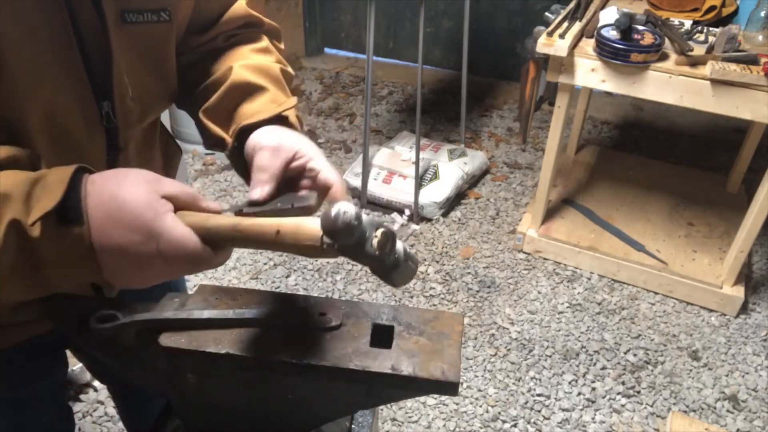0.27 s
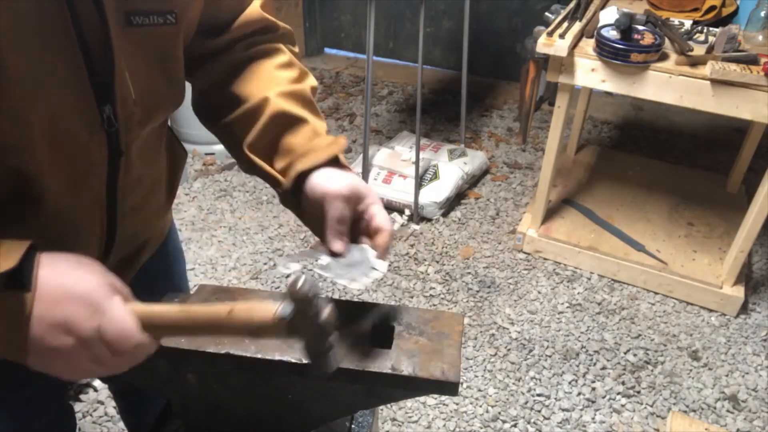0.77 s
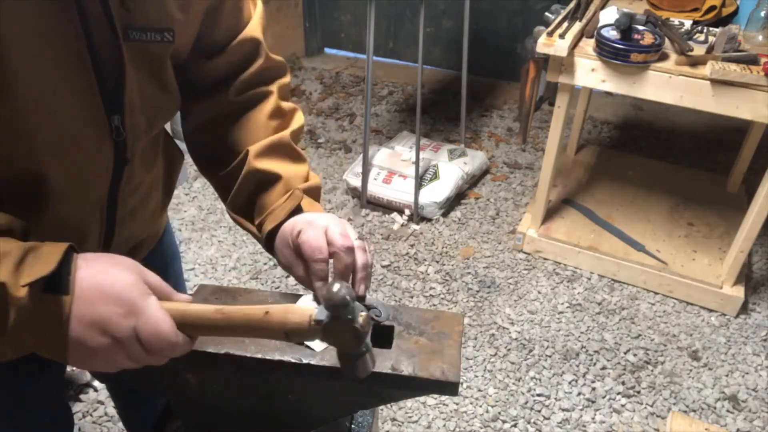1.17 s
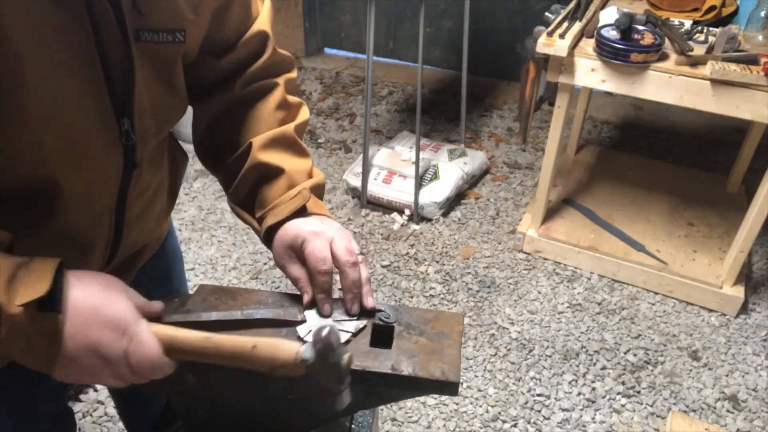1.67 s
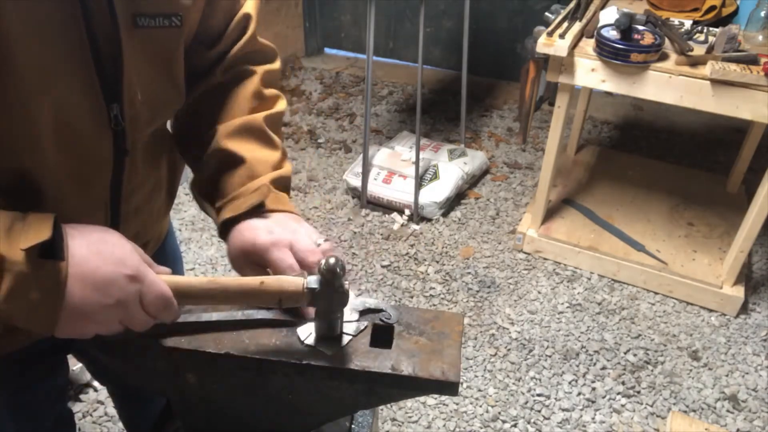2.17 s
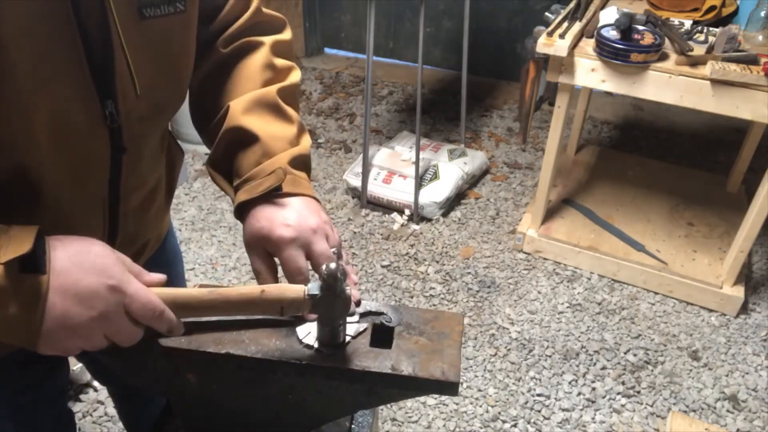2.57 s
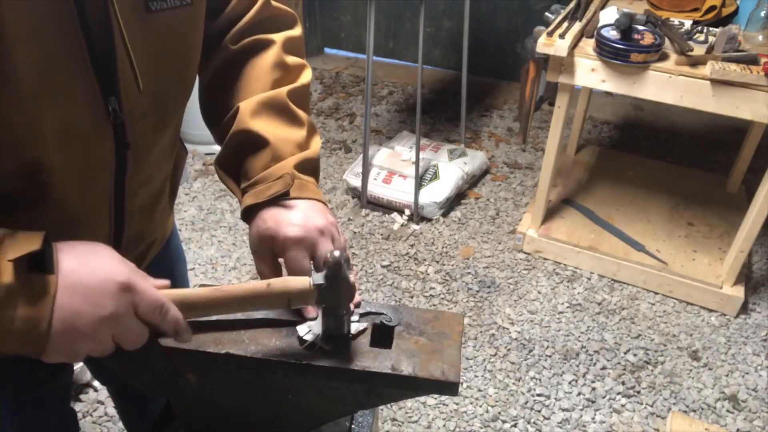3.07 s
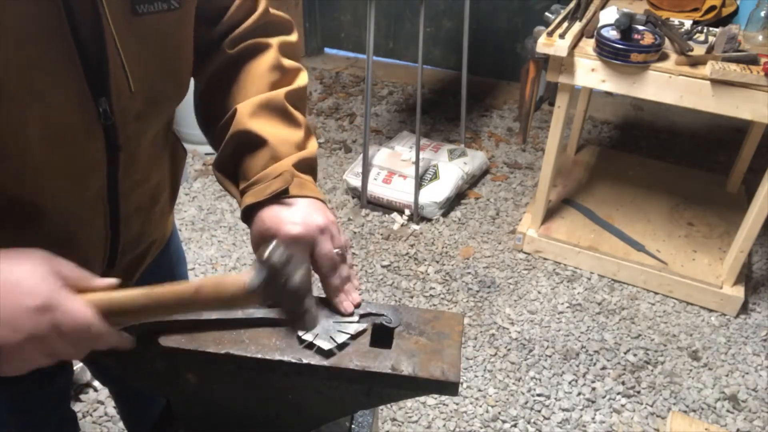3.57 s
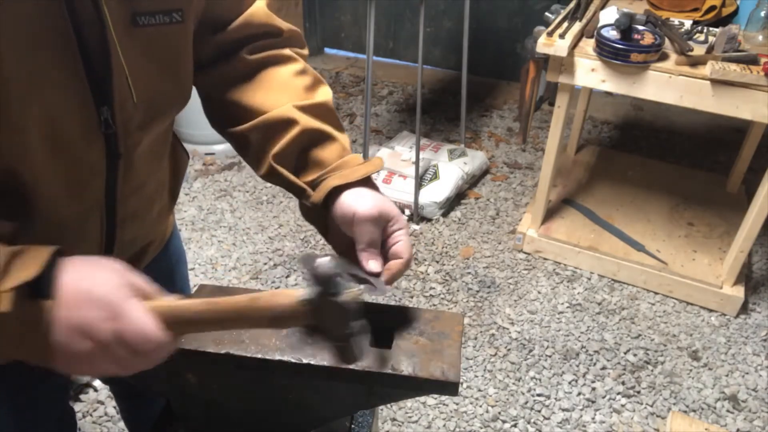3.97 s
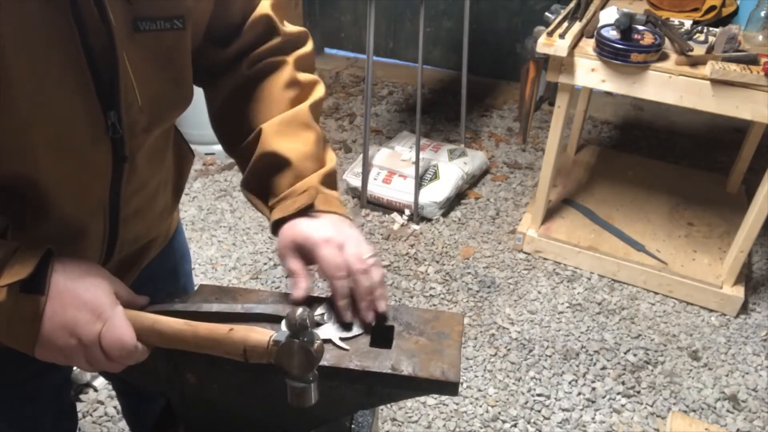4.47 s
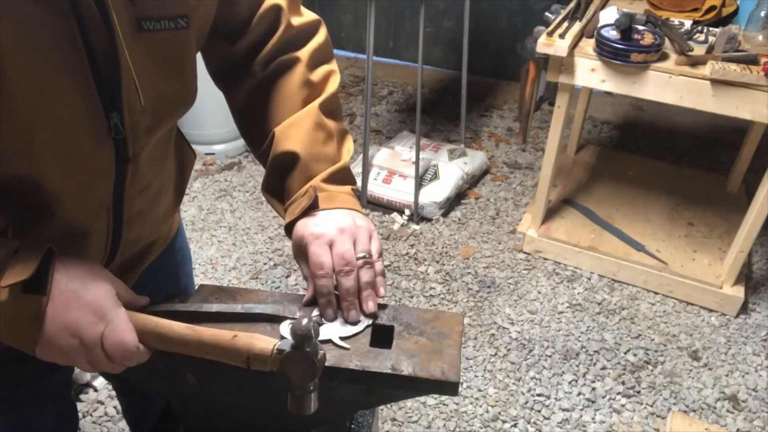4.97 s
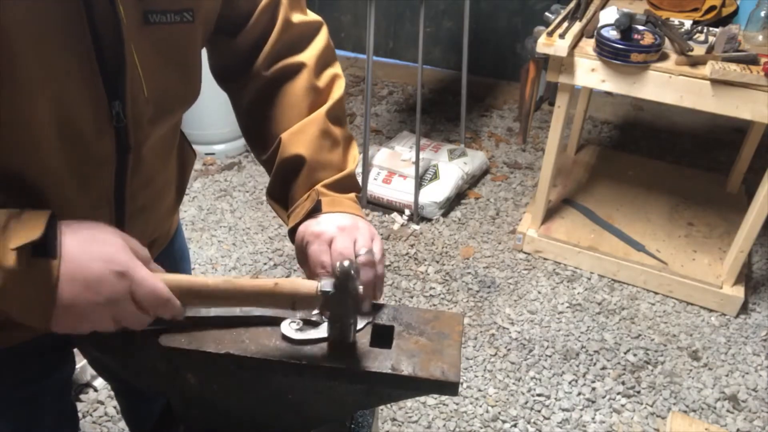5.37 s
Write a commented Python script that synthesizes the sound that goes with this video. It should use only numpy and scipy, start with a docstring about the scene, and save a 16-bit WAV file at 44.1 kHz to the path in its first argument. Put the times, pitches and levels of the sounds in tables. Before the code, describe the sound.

Faint hand bumps, sleeve rustle and light metallic clinks come first as a piece of thin sheet steel is positioned on an anvil. Midway, a small hammer strikes it in a fast, even burst, each blow a sharp crack with a short thud. After a pause of soft clinking and sliding, the hammer taps again briefly. The microphone is close, in a dry workshop with low steady room noise.

```python
"""A quiet, nearly dead workshop: a small hammer taps thin sheet steel, hand-pressed flat on an anvil.
Clamped under the blow, the sheet barely rings: each tap is a bright crack and a thud,
thrown back by the nearby floor and bench. Between taps the loose sheet clinks and scrapes
as it is turned, hands click and bump on the work, and a canvas sleeve rustles."""
import sys
import numpy as np
from scipy import signal
from scipy.fft import rfft, irfft, next_fast_len
from scipy.io import wavfile
from scipy.ndimage import uniform_filter1d

SR = 44100
rng = np.random.default_rng(int(sys.argv[2]) if len(sys.argv) > 2 else 0)


def unload_audio(sound):
    """Save the sound as a 16-bit wav file, at the path given as the first command line argument."""
    columns = np.transpose(np.atleast_2d(sound))
    # keep every value between -1 and 1, then stretch to whole-number steps
    steps = np.round(np.clip(columns, -1, 1) * 32767)
    wavfile.write(sys.argv[1], SR, steps.astype(np.int16))


N = 247842

# room noise spectrum: (frequency [Hz], level [dB])
AIR_SPECTRUM = [(18, -38), (30, -20), (117, -21.5), (141, -7.5), (188, -7), (264, -3), (301, -6),
                (459, -2.5), (680, -2.5), (1240, -3.5), (4980, -10), (5990, -12), (7780, -14), (14600, -13),
                (15800, -20)]
# low room resonances: (frequency [Hz], level [dB], t60 [s])
ROOM_MODES = [(488.1, -1.5, 0.143), (333.1, 3.5, 0.0706), (1590, -29, 0.14)]
# early reflections off floor, bench and body: (delay [s], level [dB])
REFLECTIONS = [(.0049, -20.5), (.0064, -16), (.0078, -16.5), (.0091, -39.5), (0.0126, -33)]
# canvas and skin on steel: (frequency [Hz], level [dB])
RUB_SPECTRUM = [(30, -33.5), (150, -11), (450, 7), (800, -8), (1800, 6), (2500, 5), (3800, -1), (5800, 3),
                (8000, 0), (13000, 1), (15600, 2), (17000, -45.5)]
# rubbing as the sleeve moves and the sheet is dragged: (time [s], level [dB])
RUB_ENVELOPE = [(0, -70), (.17, -62), (.33, -78), (.78, -70.5), (1.12, -65), (1.5, -64.5), (1.619, -70.5),
                (2.22, -68), (2.29, -60.5), (2.38, -68.5), (3.62, -72), (3.86, -62), (4.45, -63.5),
                (4.68, -67.5), (5.03, -75), (5.1, -63), (5.48, -66), (5.62, -65.5)]
# brisker rubbing is brighter: (level [dB], treble [dB])
RUB_BRIGHTNESS = [(-66.5, -2), (-59.5, 5)]
# sheet slips through the fingers: (time [s], length [s], level [dB], pitch [Hz])
FINGER_SLIPS = [(.475, 0.173, -66.5, 5513), (0.494, 0.158, -71, 12800), (5.063, 0.29, -77, 9800),
                (5.06, 0.32, -81, 5870)]
# grip shifts: (time [s], level [dB], snap [dB])
GRIP_CLICKS = [(0.2074, -28.5, 13), (5.2297, -18.5, -10)]
# modes of a grip click: (frequency [Hz], level [dB], t60 [s])
GRIP_MODES = [(1953, 4.5, 0.046), (2183, -6.5, 0.082), (4740, -12.5, 0.054), (5350, -4.5, 0.023),
              (5445, 7.5, 0.012)]
# soft bumps of hand and tools: (time [s], level [dB], pitch [Hz])
HAND_BUMPS = [(0.109, -26.5, 830), (0.267, -27, 739), (0.479, -25.5, 1227), (3.668, -14, 728),
              (4.356, -28.5, 650), (4.525, -8.5, 1172)]
# loose sheet on the anvil: (time [s], level [dB], brightness [dB], slide scale [s], spot pitch [Hz])
SHEET_CLINKS = [(1.138, -32, 11.5, 0.0041, 4850), (1.1554, -33, 14.5, 0.00072, 4930),
                (1.326, -20.5, 7.5, .034, 13700), (1.3719, -22, 10, .005, 15200),
                (1.402, -20.5, 3, 0.0028, 570), (2.1089, -17.5, 9, .001, 10250),
                (2.175, -31.5, 1, 0.0055, 13100), (3.6552, -34.5, 13, 0.00184, 14300),
                (3.666, -19, 7, 0.0051, 6650), (4.2824, -24.5, 5.5, 0.0068, 5900),
                (4.3575, -34, 11.5, 0.00187, 5450), (4.4433, -28.5, 26.5, 0.0035, 2630),
                (4.679, -31.5, 16, 0.00286, 4660), (4.979, -30, 4.5, 0.0032, 5900),
                (5.473, -31, 4.5, 0.0096, 14300)]
# loose sheet modes: (frequency [Hz], level [dB], t60 [s])
LOOSE_MODES = [(1234, -35, 0.062), (2650, -28, 0.04), (4600, -42.5, 0.06), (5900, -3.5, 0.026),
               (6190, -1, 0.057), (9940, 1, 0.038), (12370, -2.5, .05), (12900, -13.5, .04),
               (13300, -21, .03), (14300, 17.5, 0.099), (14600, -9, .035)]
# high modes of the pressed sheet: (frequency [Hz], level [dB])
PRESSED_MODES = [(12161, -53.5), (12985, -60.5), (13512, -71), (13835, -50), (14050, -46.5), (14196, -57),
                 (14346, -60), (14492, -55.5), (14723, -69), (15310, -42)]
# sharp steel contact: (frequency [Hz], level [dB])
CRACK_SPECTRUM = [(30, -3.5), (150, -0.5), (900, 0), (2000, -3), (4200, -4.5), (7000, -3.5), (10000, -3),
                  (13000, -2.5), (15400, 0), (16200, -16.5)]
# hammer blows: (time [s], strength [dB], thud [dB], treble [dB], spot pitch [Hz])
HAMMER_BLOWS = [(2.3648, -9.5, 0.5, 12, 5670), (2.3803, -15, -3, 8, 6400), (2.7391, -17.5, 0, 11, 6700),
                (2.8505, 2.5, 7.5, 3.5, 8290), (2.9279, 1.5, 5, 6, 7520), (3.0063, 1.5, -1, 3.5, 1154),
                (3.0831, 5, 2.5, 3, 881), (3.168, 4.5, 0.5, 1.77, 2816), (3.249, 2.9, -1.5, 1.5, 1850),
                (3.3233, 2.5, .5, 2.6, 2400), (3.3962, 4, 3, 4.5, 1570), (3.4668, 5.5, 1.5, .5, 1783),
                (3.537, 3.5, -2.5, .5, 1600), (4.5245, -11.5, -2, 8, 326), (5.3805, -9, -13.5, -5, 3000),
                (5.4179, -6, -0.5, 2.5, 5800), (5.5336, -4.5, 13, 10.5, 7060)]


def undb(db):
    """Decibels to gain."""
    return 10 ** (np.asarray(db) / 20)


def seconds(size=8192):
    """Time axis, one event long by default."""
    return np.arange(size) / SR


def unit(x):
    """Scale to unit energy."""
    return x / np.sqrt(np.sum(x ** 2) + 1e-18)


def fade(t, t60_s):
    """Exponential decay, 60 dB in t60_s."""
    return np.exp(-np.log(1000) * t / t60_s)


def add(out, at_s, x):
    """Mix x into out from at_s."""
    i = int(at_s * SR)
    out[i:i + len(x)] += x[:N - i]


def wander(rate_hz):
    """Smooth random drift, spread near 1."""
    knots = rng.standard_normal(int(rate_hz * N / SR) + 2)
    return np.interp(seconds(N) * rate_hz, np.arange(len(knots)), knots)


def minimum_phase(x, gain):
    """Filter by a gain per frequency bin, via the folded cepstrum."""
    size = 2 * (len(gain) - 1)
    cepstrum = irfft(np.log(gain))
    cepstrum[1:size // 2] *= 2
    cepstrum[size // 2 + 1:] = 0
    return irfft(rfft(x, size) * np.exp(rfft(cepstrum)), size)[:len(x)]


def colour(x, points):
    """Filter along (frequency [Hz], level [dB]) points."""
    hz, db = np.transpose(points)
    bins_hz = np.linspace(1, SR / 2, next_fast_len(len(x)) + 1)
    return minimum_phase(x, undb(np.interp(np.log(bins_hz), np.log(hz), db)))


def resonate(x, hz, q):
    """Damped resonance, unity gain at centre."""
    return signal.lfilter(*signal.iirpeak(min(hz, SR / 2.2), q, fs=SR), x)


def emphasise(x, hz, q, lift_db=13.5):
    """Lift the band that the touched spot favours."""
    return x + (undb(lift_db) - 1) * resonate(x, hz, q)


def ring(modes, scatter_db=0, detune=0):
    """Decaying modes, unit energy; touch and grip scatter their levels and pitches."""
    t = seconds()
    out = np.zeros(len(t))
    for hz, db, t60_s in modes:
        level_draw, pitch_draw = rng.standard_normal(2)
        tone = np.sin(2 * np.pi * hz * (1 + detune * pitch_draw) * t)
        out += undb(db + scatter_db * level_draw) * unit(tone * fade(t, t60_s))
    return unit(out)


def burst(envelope, lumpy_db=0):
    """Dense micro-impacts in clumps under an envelope; whitened, unit energy."""
    clumps = np.repeat(rng.standard_normal(len(envelope)), 32)[:len(envelope)]
    impacts = envelope * undb(lumpy_db * clumps) * rng.standard_normal(len(envelope))
    smooth_power = uniform_filter1d(np.abs(rfft(impacts, 2 * len(impacts))) ** 2, size=221)
    return unit(minimum_phase(impacts, 1 / np.sqrt(smooth_power + 1e-18)))


def air(noise_db=-66.5, hum_hz=269, hum_db=-87):
    """Steady room noise and a weak hum."""
    noise = colour(rng.standard_normal(N), AIR_SPECTRUM)
    hum = np.sqrt(2) * np.sin(2 * np.pi * hum_hz * seconds(N))
    return undb(noise_db) * noise / np.std(noise) + undb(hum_db) * hum


def in_room(x, echo_db, gap_s=0.003204, build_s=0.000224, t60_s=0.0575,
            late_t60_s=0.134, late_db=-25, modes_db=-25):
    """Direct sound plus near reflections, a quick diffuse decay and low resonances."""
    t = np.maximum(seconds() - gap_s, 0)
    decay = fade(t, t60_s) + undb(late_db) * fade(t, late_t60_s)
    echo = burst((1 - np.exp(-t / build_s)) * decay, lumpy_db=4)
    for delay_s, db in REFLECTIONS:
        path_scale = 1 + .03 * rng.standard_normal()  # the smith's arms move
        echo[int(delay_s * path_scale * SR)] += undb(db)
    echo = colour(unit(echo),
                  [(60, 1), (250, -2), (620, -.5), (1000, -.5), (3000, 2), (8000, .5), (14000, 4)])
    echo += undb(modes_db) * ring(ROOM_MODES, detune=.015)
    return x + undb(echo_db) * signal.fftconvolve(x, echo)[:len(x)]


def ticks(rate_hz=18, min_db=14, spread_db=8, t60_s=.012):
    """The dragged sheet catches on specks of scale at random."""
    out = np.zeros(N)
    for when, strength, spot in rng.random((int(rate_hz * N / SR), 3)):
        spot_hz = np.interp(spot, [0, 1], [4500, 14000])
        tick = colour(burst(fade(seconds(1900), t60_s)), RUB_SPECTRUM)
        tick = emphasise(tick, spot_hz, q=20)
        add(out, when * N / SR, undb(min_db + spread_db * strength) * unit(tick))
    return out


def rubbing(gain_db=-2.5, treble_hz=5000, patch_db=4, patch_rate_hz=16):
    """Patchy friction of sleeve and sliding steel; faster hands are louder and brighter."""
    level_db = np.interp(seconds(N), *np.transpose(RUB_ENVELOPE))
    hiss = colour(burst(np.ones(N), lumpy_db=4), RUB_SPECTRUM)
    treble = signal.sosfilt(signal.butter(1, treble_hz, "high", fs=SR, output="sos"), hiss)
    lift = undb(np.interp(level_db, *np.transpose(RUB_BRIGHTNESS))) - 1
    patches = undb(patch_db * wander(patch_rate_hz))
    friction = patches * (hiss + lift * treble) / np.std(hiss)
    return undb(level_db + gain_db) * (friction + ticks())


def slips(q=11):
    """Skin slides on steel: narrow hiss, quick onset, slow fall."""
    out = np.zeros(N)
    for at_s, length_s, db, hz in FINGER_SLIPS:
        progress = np.linspace(0, 1, int(length_s * SR))
        envelope = np.minimum(10 * progress, 1) * np.sqrt(1 - progress)
        noise = rng.standard_normal(len(progress))
        hiss = resonate(resonate(noise, hz, q), hz, q)
        add(out, at_s, undb(db) * envelope * hiss / np.std(hiss))
    return out


def handling(click_db=-4, bump_db=-10, echo_db=-10):
    """Hands take hold of the work: hard clicks, dull bumps."""
    out, t = np.zeros(N), seconds()
    for at_s, db, snap_db in GRIP_CLICKS:
        snap = colour(burst(fade(t, t60_s=0.0146)), [(200, -22.5), (1300, -10.5), (2000, 4), (3200, -12),
                                                     (5000, 1.5), (8000, -20), (14000, -10)])
        click = ring(GRIP_MODES) + undb(snap_db) * unit(snap)
        add(out, at_s, undb(db + click_db) * in_room(click, echo_db))
    for at_s, db, hz in HAND_BUMPS:
        band = [(hz / 8, -32), (hz / 1.45, -12), (hz / 1.3, 0),
                (hz * 1.177, -1), (hz * 1.424, -16), (hz * 8, -28)]
        bump = colour(burst(fade(t, t60_s=0.0187)), band)
        add(out, at_s, undb(db + bump_db) * unit(bump))
    return out


def contact(hold_s, release_s, rattle_db, rattle_t60_s, split_hz=900, lumpy_db=0):
    """Steel on steel: one clean push below split_hz, chatter of the faces above."""
    t = seconds()
    envelope = np.exp(-np.maximum(t - hold_s, 0) / release_s)
    chatter = burst(envelope + undb(rattle_db) * fade(t, rattle_t60_s), lumpy_db)
    push = -1. * (t == 0)
    low, high = (signal.butter(4, split_hz, kind, fs=SR, output="sos") for kind in ("low", "high"))
    return signal.sosfilt(low, push) + signal.sosfilt(high, chatter)


def loose_sheet(gain_db=-2, ring_db=-8, echo_db=-10):
    """The sheet skids grittily on the anvil and rings, damped and retuned by the fingers."""
    out = np.zeros(N)
    for at_s, db, bright_db, slide_s, spot_hz in SHEET_CLINKS:
        skid = contact(hold_s=.3 * slide_s, release_s=.9 * slide_s, rattle_db=-28, rattle_t60_s=.04,
                       split_hz=500, lumpy_db=4)
        touch = colour(skid, [(40, -13.5), (300, -6.5), (1200, -.91), (2200, 1), (9500, .5),
                              (14000, 1.1 * bright_db), (15300, 1.1 * bright_db), (16200, -18.5)])
        touch = emphasise(touch, spot_hz, q=5 + spot_hz / 800)
        modes = ring(LOOSE_MODES, scatter_db=3, detune=.009)
        ringing = unit(signal.fftconvolve(skid, modes)[:len(skid)])
        clink = touch + undb(bright_db + ring_db) * ringing
        add(out, at_s, undb(db + gain_db) * in_room(clink, echo_db))
    return out


def press(length_s, rise_s=0.00144):
    """The hammer face flattens the springy sheet: a crunch swelling into the crack."""
    t = seconds(int(length_s * SR))
    return unit(np.exp(t / rise_s) * rng.standard_normal(len(t)))


def hammer(ring_db=-16.5, ring_t60_s=0.102, press_s=0.0026, press_db=-26.5):
    """Blows on the clamped sheet; where and how squarely the face lands sets thud and treble."""
    out = np.zeros(N)
    modes = [(hz, db, ring_t60_s) for hz, db in PRESSED_MODES]
    for at_s, db, thud_db, treble_db, spot_hz in HAMMER_BLOWS:
        # firm blows have a loud echo relative to the crack; light taps sound dry
        echo_db = -0.83 if db > 0 else -11
        rattle_db = -10.5 + 0.083 * echo_db  # light taps chatter less
        mid_db = -2.39 + 0.437 * thud_db  # squarer blows fill the middle
        crack = contact(hold_s=0.000737, release_s=0.000616, rattle_db=rattle_db, rattle_t60_s=0.0204)
        crack = colour(crack, CRACK_SPECTRUM)
        crack = colour(crack, [(440, thud_db), (880, mid_db), (1900, mid_db),
                               (3200, 0), (9500, 0), (13500, treble_db)])
        crack = emphasise(crack, spot_hz, q=4.5, lift_db=8)
        ringing = undb(ring_db + treble_db + echo_db) * ring(modes, scatter_db=2, detune=.002)
        add(out, at_s, undb(db) * (in_room(crack, echo_db) + ringing))
        add(out, at_s - press_s, undb(db + press_db) * press(press_s))
    return out


def scene():
    """Mono mix, an arm's length from the anvil."""
    return (hammer() + loose_sheet() + handling() + slips() + rubbing() + air())[None]


def record(dry, cutoff_hz=16250):
    """Steep elliptic low-pass."""
    return signal.sosfilt(signal.ellip(8, .2, 70, cutoff_hz, fs=SR, output="sos"), dry)


dry = scene()
out = record(dry)
unload_audio(out)
```